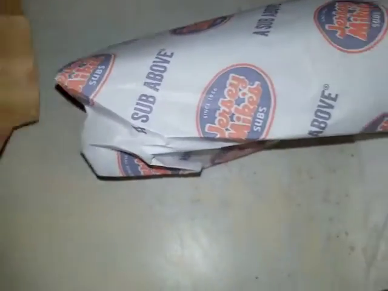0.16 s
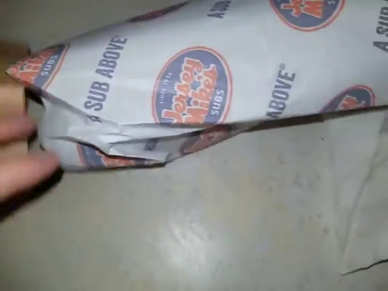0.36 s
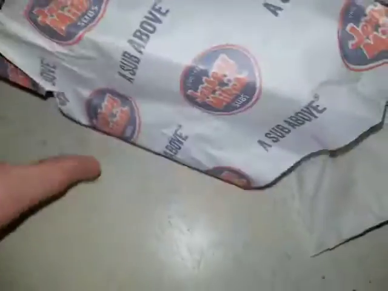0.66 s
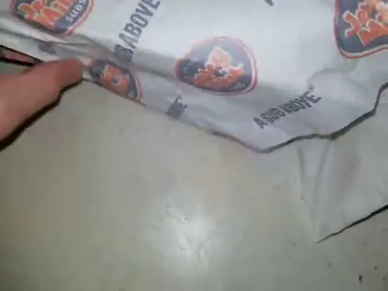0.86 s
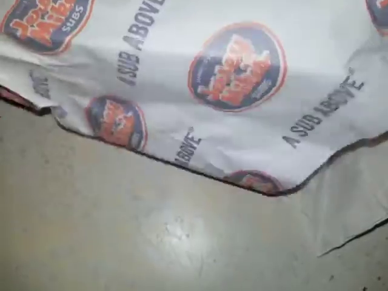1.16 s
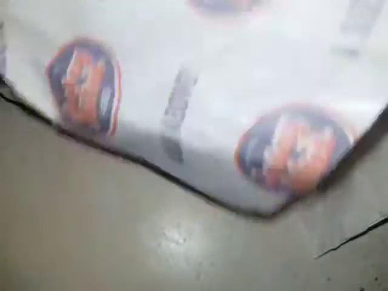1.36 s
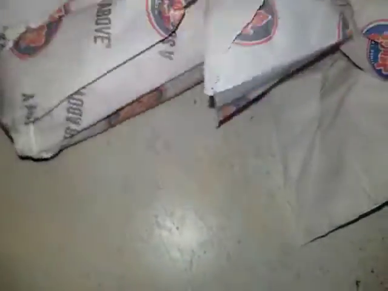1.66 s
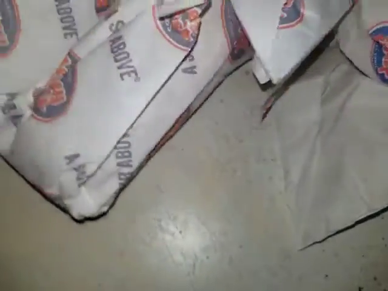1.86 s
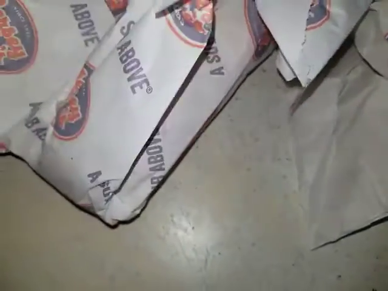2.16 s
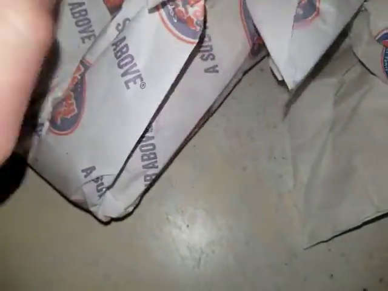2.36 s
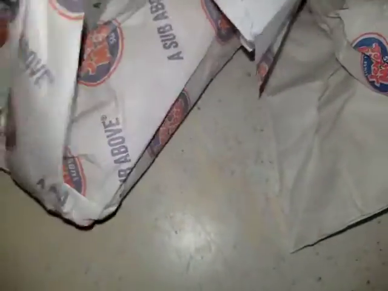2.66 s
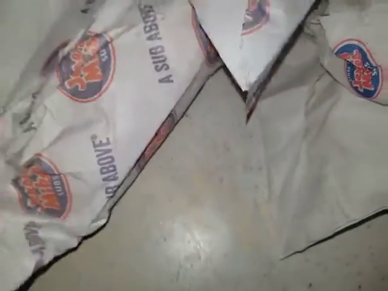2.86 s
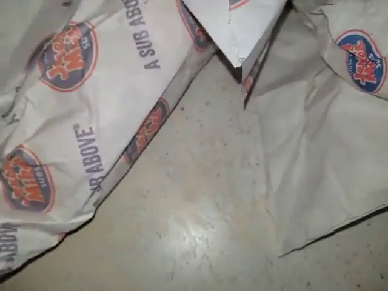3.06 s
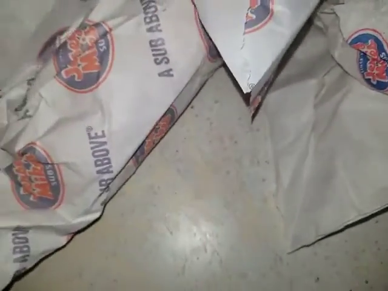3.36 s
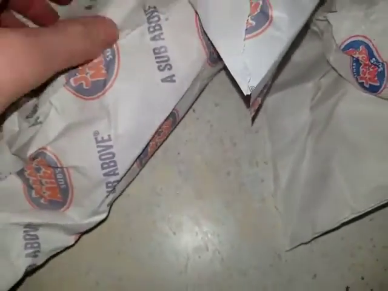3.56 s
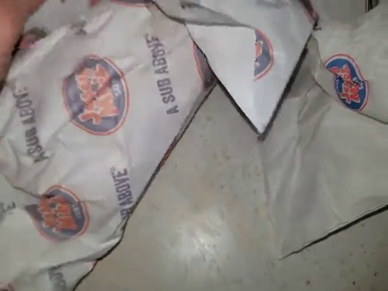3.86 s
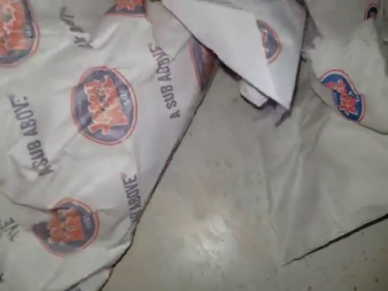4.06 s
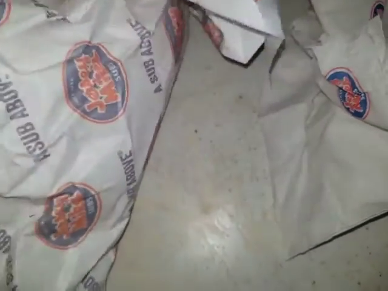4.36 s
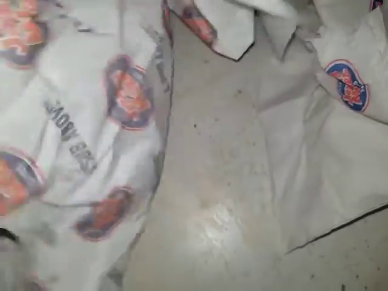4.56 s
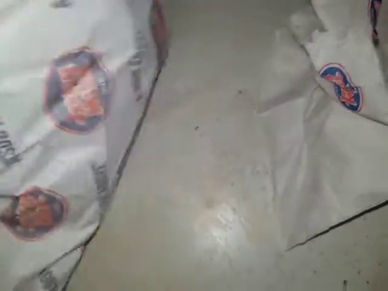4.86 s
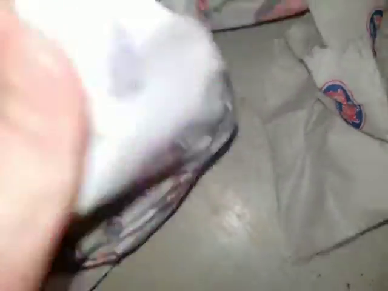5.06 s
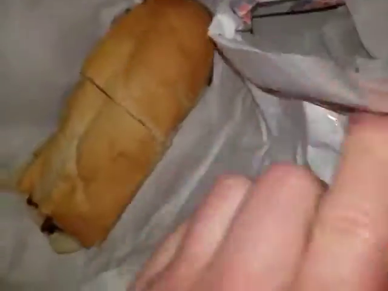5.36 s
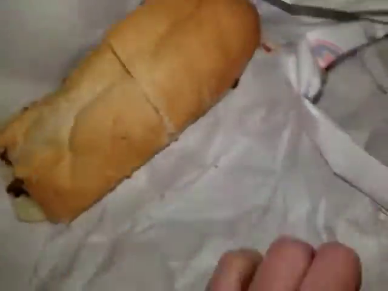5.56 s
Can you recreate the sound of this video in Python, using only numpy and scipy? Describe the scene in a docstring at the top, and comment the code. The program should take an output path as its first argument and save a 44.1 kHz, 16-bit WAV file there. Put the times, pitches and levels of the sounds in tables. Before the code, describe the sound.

Hands unwrap a paper-wrapped sandwich on a hard counter. Short pulls bring dry rustle and sharp crease snaps from the start, dense through the middle, with soft low bumps of the parcel. A strong crackling burst near four and a half seconds gives way to a quieter moment, then a last rustle. Close stereo microphones, paper stronger on the left, small room, faint hiss.

```python
"""Stiff paper wrapper, unrolled close up

A hand unrolls a stiff paper wrapper on a kitchen counter, close to a pair of small microphones.
Creases buckle with sharp snaps: noise bursts that ring facets of the paper, some after a swelling run of slips.
The sheet rustles as it slides and bends (clumped puffs of noise in 14 bands) and flexes in low noise.
The parcel inside thuds softly as ringing puffs; a small hard room answers with a short dying noise tail.
Faint room air and microphone hiss lie beneath."""
import sys
import numpy as np
from scipy import signal
from scipy.fft import rfft, irfft
from scipy.io import wavfile
from scipy.ndimage import uniform_filter1d

SR = 44100
rng = np.random.default_rng(int(sys.argv[2]) if len(sys.argv) > 2 else 0)


def rack_gain(trim_db):
    """Turn a fader trim in dB into the linear factor to multiply a signal by."""
    fader = np.asarray(trim_db, float)
    return 10 ** (fader / 20)


def store_wav(level_fs):
    """Save 16-bit WAV to argv[1]."""
    pcm = np.round(np.clip(np.atleast_2d(level_fs), -1, 1) * 32767)
    wavfile.write(sys.argv[1], SR, pcm.T.astype(np.int16))


N = 251811   # length [samples]


def rms_one(x):
    """Scale to rms 1."""
    return x / np.sqrt(np.mean(x ** 2) + 1e-20)


def colour(x, points):
    """Causal (minimum-phase) filter through (frequency [Hz], gain [dB]) points."""
    point_hz, point_db = np.transpose(points)
    hz = np.fft.rfftfreq(4096, 1 / SR) + 1   # keeps the logarithm finite
    log_gain = np.interp(np.log(hz), np.log(point_hz), point_db) * np.log(10) / 20
    # folding the cepstrum onto positive times gives minimum phase
    cepstrum = irfft(log_gain)
    cepstrum[1:2048] *= 2
    cepstrum[2049:] = 0
    impulse = irfft(np.exp(rfft(cepstrum)))
    return signal.fftconvolve(x, impulse * np.ones(np.shape(x)[:-1] + (1,)), axes=-1)[..., :N]


def drift(rate_hz):
    """Slow random curve of rms 1: noise through two equal low-pass poles, drawn at every 20th sample."""
    r = np.exp(-40 * np.pi * rate_hz / SR)
    noise = rng.standard_normal(N // 20 + 2002)
    slow = signal.lfilter([1], [1, -2 * r, r * r], noise)[2000:]   # skip the filter's start
    return np.interp(np.arange(N) / 20, np.arange(len(slow)), rms_one(slow))


def resonance(x, hz, width_hz):
    """A damped two-pole ring, such as a facet of paper, with a peak gain near 1."""
    r = np.exp(-np.pi * width_hz / SR)
    top = np.array([1, 0, -1]) * (1 - r * r) / 2
    return signal.lfilter(top, [1, -2 * r * np.cos(2 * np.pi * hz / SR), r * r], x)


def butter(x, order, hz, kind):
    """Butterworth filter."""
    return signal.sosfilt(signal.butter(order, hz, kind, fs=SR, output="sos"), x)


def fibres(shape, alike):
    """White noise as each port hears it: partly shared, partly from another patch of the sheet."""
    near, other = rng.standard_normal((2,) + shape)
    alike = np.clip(alike, 0, 1)
    return np.array([near, alike * near + np.sqrt(1 - alike ** 2) * other])


def in_time(rows):
    """Table columns as curves over time."""
    s, *columns = np.transpose(rows)
    return [np.interp(np.arange(N) / SR, s, c) for c in columns]


def room_air():
    """Steady room air and microphone hiss: coloured noise, partly shared by the two ports."""
    # spectrum of the air: (frequency [Hz], relative density [dB per Hz])
    air_spectrum = [(30, -32), (300, -21), (2000, -14), (9000, -26), (15500, -12)]
    rms_db = -54.5
    return rack_gain(rms_db) * rms_one(colour(fibres((N,), alike=0.34), air_spectrum))


def hand():
    """Rustle level in dB: each pull rises fast, runs its course and dies away to the resting sheet."""
    # pulls on the sheet: (start [s], length [s], rustle at the start [dB], rustle at the end [dB])
    pull_rows = [(0.044, 0.14, -34, -49), (0.348, 0.073, -33.5, -35), (0.435, 0.21, -26.5, -38.5),
                 (0.723, 0.065, -36, -35.5), (0.894, 0.13, -28, -31.5), (1.147, 0.062, -33.5, -33.5),
                 (1.261, 0.16, -30.5, -32), (1.337, 0.19, -36.5, -32), (1.616, 0.11, -31.5, -34.5),
                 (1.785, 0.063, -25.5, -33), (1.956, 0.19, -33.5, -27), (2.204, 0.047, -46, -33.5),
                 (2.318, 0.096, -25.5, -39), (2.492, 0.14, -32, -50), (2.643, 0.25, -27.5, -35),
                 (2.94, 0.094, -31.5, -29.5), (3.1, 0.14, -32, -32.5), (3.324, 0.0072, -24, -33.5),
                 (3.39, 0.036, -34, -30), (3.586, 0.052, -36.5, -29.5), (3.791, 0.0078, -25.5, -31.5),
                 (3.915, 0.065, -28, -33), (4.013, 0.29, -30.5, -37), (4.371, 0.085, -30.5, -33),
                 (4.531, 0.13, -23, -37), (4.646, 0.064, -22.5, -26), (4.79, 0.075, -24, -31.5),
                 (4.915, 0.16, -32, -40), (5.073, 0.29, -52, -44), (5.47, 0.04, -51, -39),
                 (5.53, 0.029, -43, -28), (5.637, 0.082, -30.5, -36)]
    grip_db_per_s, let_go_db_per_s, resting_db = 536, 240, -51
    t = np.arange(N) / SR
    power = rack_gain(2 * resting_db)
    for s, length, start_db, end_db in pull_rows:
        held = np.interp(t, [s, s + length], [start_db, end_db])
        rise_db = grip_db_per_s * np.maximum(s - t, 0)
        fall_db = let_go_db_per_s * np.maximum(t - s - length, 0)
        power = power + rack_gain(2 * (held - rise_db - fall_db))
    return 10 * np.log10(power)


def rustle(level_db, tilt_db, per_s, spread_db, clump_db):
    """Tiny buckles come in clumps, each a short puff ringing a facet of its own size, over sliding hiss."""
    out, motion, clumps = 0, 0, drift(26.0)
    clumping = rack_gain(clump_db * clumps)
    # a gentle touch mostly slides, a firm one buckles the sheet
    crackle = np.clip((level_db + 50) / 30, .1, .6)
    # some buckles sound in every band at once
    wide_sizes = rack_gain(0.33 * np.minimum(rng.exponential(1, N), 4))
    wide = wide_sizes * (rng.random(N) < 60 * clumping / SR)
    for hz in np.geomspace(800, 14000, num=14):
        born = rng.random(N) < per_s * clumping / SR
        sizes = rack_gain(spread_db * np.minimum(rng.exponential(1, N), 4))
        puff_s = 0.0011 + 0.82 / hz   # large facets sound longer
        keep = np.exp(-1 / (puff_s * SR))
        # each puff swells, then fades
        puffs = rms_one(signal.lfilter([1], [1, -2 * keep, keep ** 2], born * sizes + wide))
        # sliding friction fills the gaps
        sliding = rack_gain(clump_db * (2.7 * clumps + 0.3 * drift(36.0)))
        envelope = crackle * puffs + (1 - crackle) * sliding
        noise = fibres((N,), alike=np.clip(900 / hz, .3, .7))
        ring = resonance(noise * envelope, hz, 0.45 * hz)
        # brightness in dB per octave about 3 kHz; facets change as folds move
        band_db = np.log2(hz / 3000) * tilt_db + 3.8 * drift(1.63)
        out = out + ring * rack_gain(band_db)
        motion = motion + envelope
    return rack_gain(level_db) * rms_one(out), rms_one(uniform_filter1d(motion, size=300))


def low_flexing(rustle_db, flex_db, motion):
    """The broad sheet bends as a whole: low noise, the same at both ports, moving with the rustle."""
    # spectrum of the flexing: (frequency [Hz], relative density [dB per Hz])
    flex_spectrum = [(20, -17), (45, -6), (100, 1), (255, 2), (400, 1), (800, -3), (1600, -29), (4000, -56)]
    noise = rms_one(colour(fibres((N,), alike=1.0), flex_spectrum))
    # the broad sheet follows the hand slowly
    level_db = uniform_filter1d(rustle_db, size=3000) + flex_db + 2.5
    flutter_db = 2.5 * drift(25)
    return noise * motion * rack_gain(level_db + flutter_db)


def snaps():
    """A crease gives way in a swelling run of slips, then snaps; the freed facet rings at its own pitch."""
    # single creases, level ahead of the paper's colour:
    # (time of the snap [s], peak level [dB], ring of the facet [Hz], fall [ms])
    crease_rows = [(0.056, -38, 1870, 2.5), (0.1129, -19, 2130, 3.7), (0.3268, -17, 2060, 9.4),
                   (0.3306, -12, 7300, 1.2), (0.3602, -25, 3250, 2.5), (0.422, -35, 3420, 3.3),
                   (0.446, -27, 1800, 5.3), (0.456, -21, 6560, 3.8), (0.465, -18, 6000, 0.71),
                   (0.492, -22, 5460, 1.5), (.531, -22, 1200, 2.4), (0.5702, -22, 1800, 9.5),
                   (0.621, -24.5, 1670, 9.5), (0.654, -20, 7040, 0.26), (0.769, -8, 5450, 0.68),
                   (.818, -31, 900, 2), (0.879, -21.5, 1190, 7.1), (0.899, -18.5, 3880, 0.73),
                   (0.904, -20, 3000, 3.5), (0.988, -23, 8650, 2.4), (1.007, -22.5, 2000, 7),
                   (1.049, -33, 4540, 1.5), (1.185, -21, 2840, 1.3), (1.244, -9, 4230, 1.4),
                   (1.295, -18.5, 4740, 1.6), (1.3201, -12.5, 3260, 0.53), (1.333, -17, 2500, 3.5),
                   (1.339, -21, 3980, 2.7), (1.358, -13, 4220, 1.7), (1.3645, -17.5, 7000, 1.5),
                   (1.396, -24, 4000, 1.5), (1.4115, -16, 4170, 3.9), (1.442, -21, 6000, 3),
                   (1.4482, -8.5, 6440, 1.8), (1.518, -26, 4300, 2.4), (1.5519, -12, 3200, 0.6),
                   (1.56, -22, 5000, 1.5), (1.5948, -11.5, 5370, 3.6), (1.845, -10.5, 10800, 0.52),
                   (1.867, -17, 6450, 1.3), (1.9087, -20.5, 3150, 1.1), (1.9538, -21.5, 5600, 5.6),
                   (1.9628, -10, 6800, 2.2), (2.035, -12, 4800, 2.5), (2.05, -14.5, 7050, 3.2),
                   (2.155, -16.5, 6000, 6.3), (2.239, -27.5, 1300, 5.1), (2.299, -26, 4060, 9.3),
                   (2.442, -24.5, 3650, 2.6), (2.4717, -17.5, 6100, 5.8), (2.49, -7, 6400, 5.8),
                   (2.641, -17.5, 7600, 4.6), (2.7506, -10, 3790, 0.99), (2.8, -16, 4400, 11.7),
                   (2.8445, -17, 4970, 2.2), (2.851, -13.5, 7400, 0.27), (2.878, -22, 7150, 1.5),
                   (2.909, -19.5, 2430, 1.2), (2.937, -27, 4600, 1.8), (2.9475, -11.5, 7700, 0.54),
                   (2.965, -17.5, 5960, 1.7), (3.06, -13, 8150, 1.3), (3.0761, -15, 1990, 0.84),
                   (3.122, -29, 4030, 2), (3.235, -17, 1830, 1.5), (3.2445, -16, 7550, 7.4),
                   (3.3061, -22.5, 1920, 7.8), (3.375, -22.5, 3900, 1.9), (3.402, -23, 3730, 2),
                   (3.4188, -19, 3580, 3.2), (3.699, -20, 6200, 1.3), (3.706, -10, 7700, 0.21),
                   (3.759, -29, 4000, 2.5), (3.855, -13, 6560, 2.4), (4.0223, -16.5, 7300, 0.7),
                   (4.037, -19.5, 4730, 1.7), (4.052, -19, 4700, 2.8), (4.157, -16.5, 6170, 0.47),
                   (4.1702, -26, 6030, 0.95), (4.211, -20.5, 6650, 1.4), (4.259, -25.5, 6550, 2.6),
                   (4.3408, -19.5, 7100, 15), (4.444, -16.5, 6140, 3.6), (4.4763, -20, 7440, 3.1),
                   (4.5233, -13, 2810, 0.37), (4.585, -15, 6850, 0.37), (4.6293, -15.5, 7300, 3.3),
                   (4.9133, -18.5, 9500, 3.8), (4.974, -11, 5300, 0.75), (5.015, -27, 2150, 0.92),
                   (5.164, -32.5, 2730, 1.2), (5.197, -30.5, 950, 0.78), (5.2983, -18.5, 5960, 1.7),
                   (5.408, -33, 1140, 2.8), (5.459, -28, 5000, 1.5), (5.465, -25.5, 4470, 2.5),
                   (5.58, -21.5, 3400, 1.4), (5.658, -14.5, 5830, 2.5), (5.689, -16, 5000, 3.2)]
    # long folds giving way slip by slip, level likewise:
    # (time of the snap [s], peak level [dB], ring of the facet [Hz], swell [ms], fall [ms])
    fold_rows = [(.02, -23.5, 1350, 4.5, 23), (.7771, -20.5, 2460, 7.7, 2.3), (1.685, -24, 2380, 20, 8),
                 (1.729, -23, 2900, 5.6, 5), (1.7996, -10, 7000, 8.9, 1.9), (2.213, -24.5, 3170, 5.3, 1.7),
                 (2.3689, -18.5, 6300, 11, 19), (2.657, -16, 6100, 9.8, 1.2),
                 (3.005, -20.5, 5300, 5.3, 1.6), (3.092, -12.5, 5400, 2.5, 4.8),
                 (3.1901, -15, 7540, 3.1, 2.9), (3.2007, -20, 3900, 5.7, 4.4), (3.7727, -20, 2410, 3.2, 12),
                 (3.9201, -14, 6800, 4.1, 1.6), (4.6671, -13.5, 5360, 9.3, 20),
                 (4.7815, -14, 4270, 6.4, 28), (4.8002, -24, 6250, 24, 4.3)]
    crease_swell_ms = 0.87
    events = [(s, db, hz, crease_swell_ms, fall) for s, db, hz, fall in crease_rows] + list(fold_rows)
    out = np.zeros((2, N + 6144))
    t = (np.arange(6144) - 2048) / SR   # the snap is at 0
    before, after = np.minimum(t, 0), np.maximum(t, 0)
    for s, peak_db, hz, swell_ms, fall_ms in events:
        swell, fall, at = swell_ms / 1000, fall_ms / 1000, round(s * SR)
        rise = np.exp(before / swell) * (t > -2.5 * swell)
        decay = np.exp(-after / fall) + 0.11 * np.exp(-after / 0.0055)
        envelope = np.where(t < 0, rise, decay)
        slips = rack_gain(3.3 * np.repeat(rng.standard_normal(192), 32))   # uneven slips along the crease
        burst = fibres((6144,), alike=0.16) * envelope * slips
        # the crack of the crease itself, weaker after a long swell
        burst[:, 2048:2054] += 1.73 * rng.standard_normal((2, 6)) / (1 + swell / 0.00083)
        # small facets sound thin, large ones dull
        low_hz, high_hz = min(0.5 * hz, 4000), min(4.02 * hz, .45 * SR)
        facet = butter(burst, 2, [low_hz, high_hz], "band")
        bright = 1.48 * butter(burst, 2, low_hz, "high")
        # slow falls ring less clearly
        ring = 3.0 * resonance(burst, hz, 0.11 * hz) / (1 + fall / 0.0077)
        burst = bright + facet + ring
        # a neighbouring facet joins in
        neighbour_hz = min(hz * 2 ** rng.uniform(-1.246, 1.27), .4 * SR)
        burst = burst + 0.55 * resonance(burst, neighbour_hz, 0.042 * hz)
        peak = np.sqrt(np.max(uniform_filter1d(burst[0] ** 2, size=48)))
        out[:, at:at + 6144] += burst * rack_gain(peak_db) / peak
    return out[:, 2048:N + 2048]


def paper_colour(x):
    """Paper and microphone port tint the rustle and snaps, each side in its own way."""
    # response at the left and right port: (frequency [Hz], gain [dB])
    left_response = [(300, -11.5), (800, 1.5), (1500, -1), (2000, 0), (3500, -1), (5500, -3), (7200, -1),
                     (8300, -9), (9300, -9), (11500, -5), (14000, -7.5), (15600, -1.5)]
    right_response = [(300, -20.5), (800, -1.5), (1500, 1.5), (2000, 1), (2700, -8.5), (3700, -2.5),
                      (5300, -12), (7000, -13.5), (8300, -6), (9300, -3.5), (10300, -7.5), (11800, -3.5),
                      (14300, -6), (15600, -22)]
    return np.array([colour(x[0], left_response), colour(x[1], right_response)])


def thuds():
    """Parcel and fingers bump the counter: a dull puff ringing a few cycles in the hollow of the wrapper."""
    # bumps on the counter: (start [s], level [dB], ring [Hz])
    bump_rows = [(0.018, -15.5, 850), (0.109, -23.5, 398), (0.396, -25.5, 610), (0.44, -31, 260),
                 (0.871, -26, 252), (0.968, -22, 230), (1, -23.5, 890), (1.324, -21, 740), (1.845, -18, 45),
                 (2.081, -32, 90), (2.43, -22.5, 129), (2.476, -14, 280), (2.589, -22, 85.5),
                 (3.012, -22.5, 255), (3.184, -20.5, 230), (3.205, -25, 176), (3.774, -23.5, 318),
                 (4.198, -22.5, 342), (4.659, -21, 252), (4.783, -19.5, 181), (4.85, -27.5, 460),
                 (5.494, -36.5, 920), (5.528, -28.5, 690)]
    out, t = np.zeros((2, N + 8192)), np.arange(8192) / SR
    for s, level_db, hz in bump_rows:
        # the parcel settles afterwards in a faint longer tail
        decay = np.exp(-t / 0.0073) + 0.031 * np.exp(-t / 0.11)
        envelope = (1 - np.exp(-t * hz / 1.93)) * decay
        edges = [max(0.21 * hz, 20), min(3.85 * hz, 1700)]
        puff = butter(fibres((8192,), alike=0.71) * envelope, 2, edges, "band")
        puff = puff + 3 * resonance(puff, hz, 15 + 0.13 * hz)
        at = round(s * SR)
        size = np.sqrt(np.mean(puff ** 2) / np.mean(envelope ** 2))
        out[:, at:at + 8192] += puff * rack_gain(level_db) / size
    return out[:, :N]


def room(x):
    """Dense dull echoes from counter and walls: a dying noise tail, another one for each port."""
    t60_s, wall_cut_hz, level_db = 0.13, 2850, -16.5
    t = np.arange(SR // 4) / SR
    decay = rack_gain(-60 * t / t60_s) * (1 - np.exp(-t / 0.0013))
    tail = butter(rng.standard_normal((2, len(t))) * decay, 1, wall_cut_hz, "low")
    tail = tail / np.sqrt(np.sum(tail ** 2) / 2)
    return rack_gain(level_db) * signal.fftconvolve(x, tail, axes=-1)[:, :N]


def scene():
    """Paper, parcel, room and air at the two ports; the paper lies nearer the left one."""
    # how the sheet lies: (time [s], low flexing against the rustle, ahead of a fixed lift [dB],
    # brightness [dB per octave], drop of the right port below the left, besides colour [dB])
    pose_rows = [(0, -6, -8.5, 2), (.2, -5.5, 1, 6), (.45, -12, 1, 1.5), (.8, -18, 1.65, 4),
                 (2.1, -13.5, -2, 3.5), (2.9, -17.5, -0.34, 5.5), (3.5, -13.5, -2, 3.5),
                 (4.4, -17.5, -0.5, 4.5), (5.2, -17.5, 0, 0.5), (5.71, -17.5, -1.5, 3.5)]
    right_lag_s = .00042
    rustle_db = hand()
    flex_db, tilt_db, pan_db = in_time(pose_rows)
    hiss, motion = rustle(rustle_db, tilt_db, per_s=40, spread_db=3.5, clump_db=1.5)
    paper = paper_colour(snaps() + hiss)
    near = paper + low_flexing(rustle_db, flex_db, motion) + thuds()
    late_right = np.pad(near[1], (round(right_lag_s * SR), 0))[:N]
    near[1] = late_right * rack_gain(-pan_db)
    return near + room(near) + room_air()


def low_pass(x):
    """Removes everything above the highest recorded frequency."""
    return signal.sosfilt(signal.butter(12, 17140, fs=SR, output="sos"), x)


def record(dry):
    """The top is cut in two steep steps: by 38 dB above 15.8 kHz, then by 80 dB more above 16.9 kHz."""
    step = signal.sosfilt(signal.ellip(7, .5, 38, 15800, fs=SR, output="sos"), dry)
    mix = signal.sosfilt(signal.ellip(10, .5, 80, 16900, fs=SR, output="sos"), step)
    return low_pass(mix)


dry = scene()
out = record(dry)
store_wav(out)
```